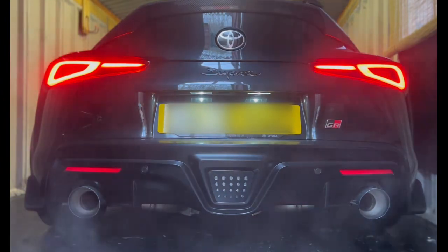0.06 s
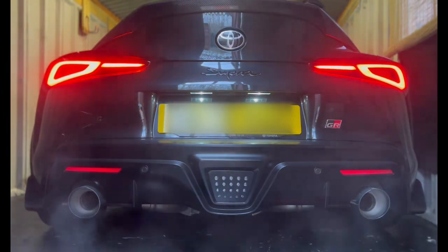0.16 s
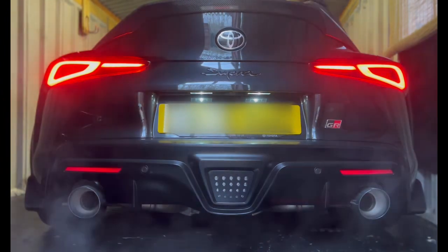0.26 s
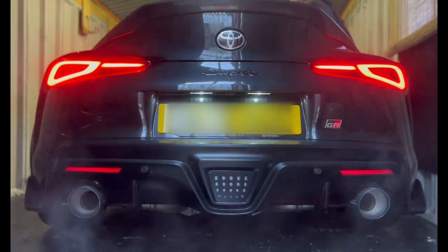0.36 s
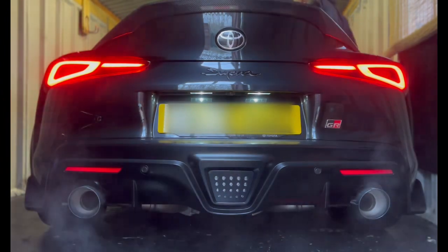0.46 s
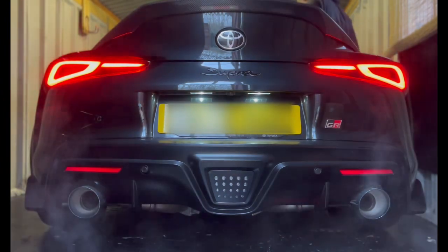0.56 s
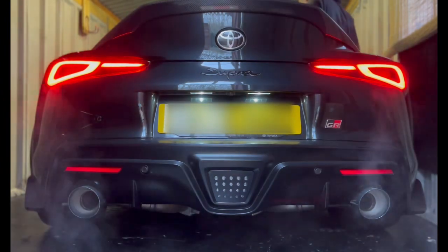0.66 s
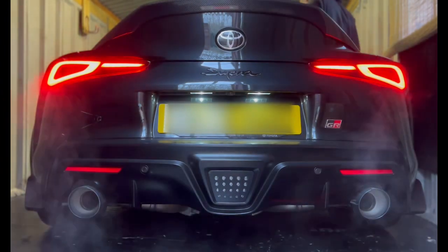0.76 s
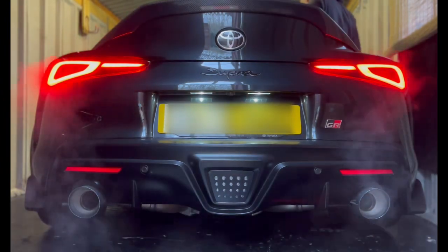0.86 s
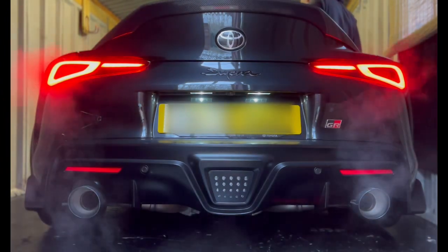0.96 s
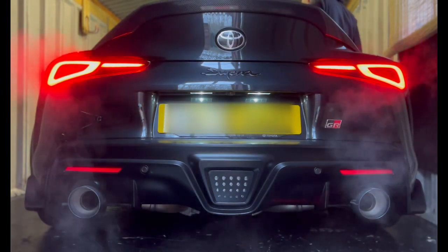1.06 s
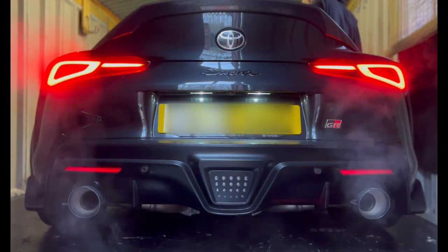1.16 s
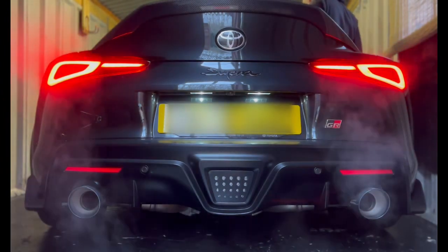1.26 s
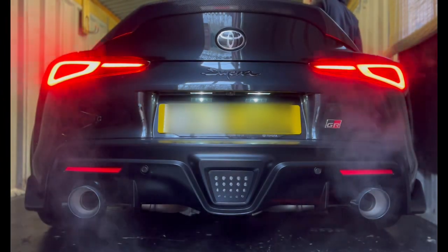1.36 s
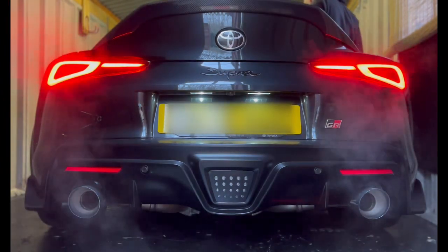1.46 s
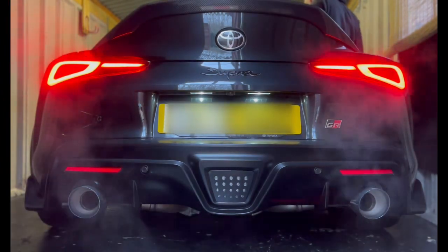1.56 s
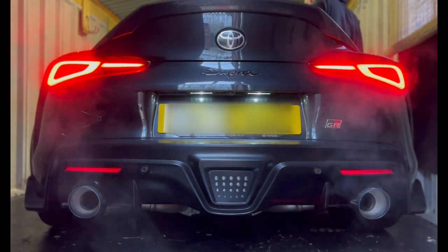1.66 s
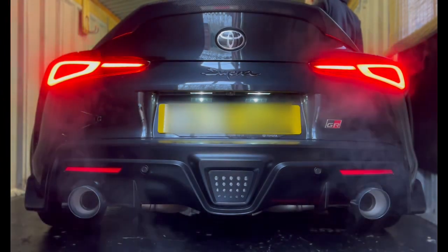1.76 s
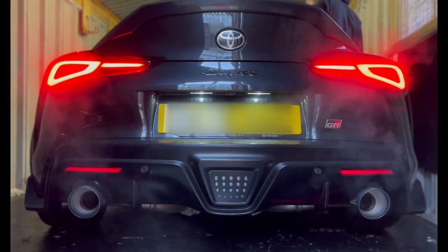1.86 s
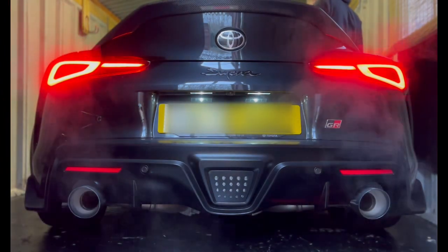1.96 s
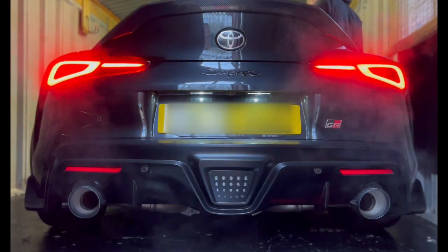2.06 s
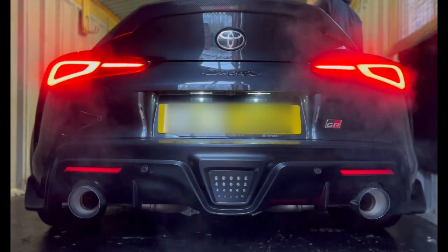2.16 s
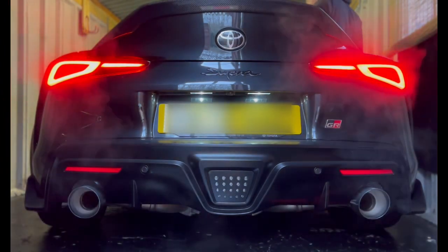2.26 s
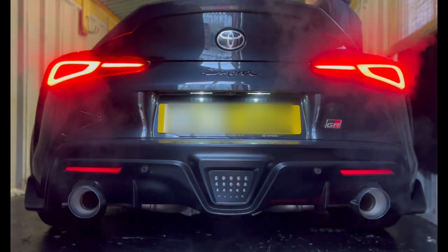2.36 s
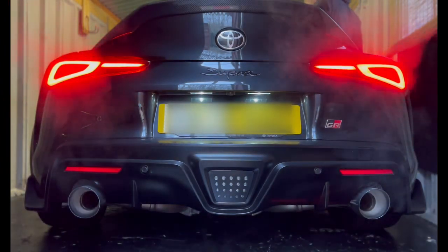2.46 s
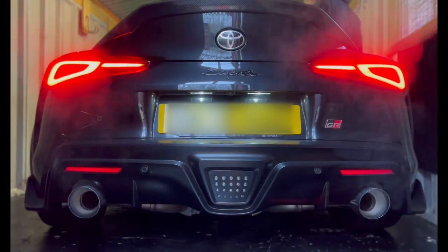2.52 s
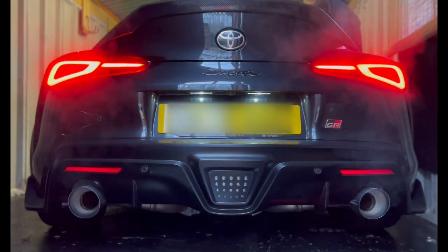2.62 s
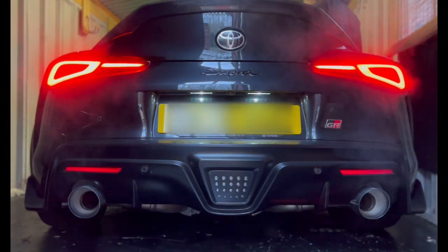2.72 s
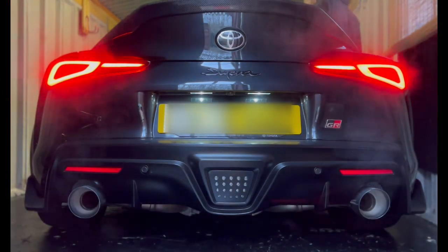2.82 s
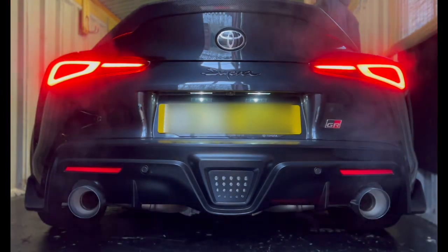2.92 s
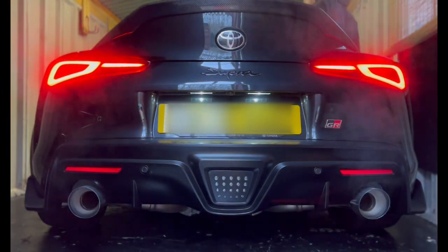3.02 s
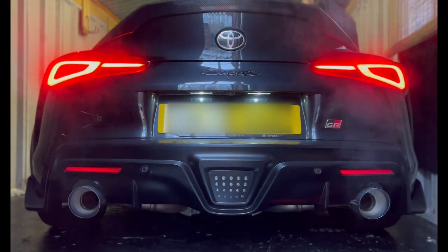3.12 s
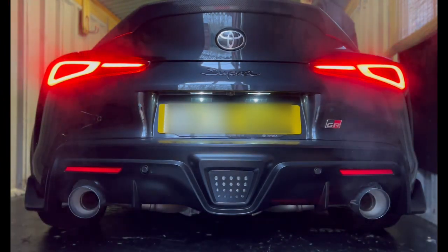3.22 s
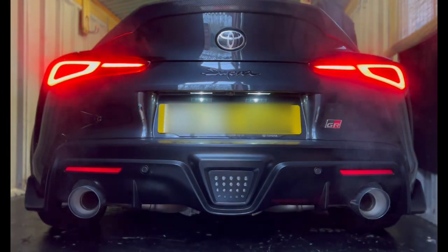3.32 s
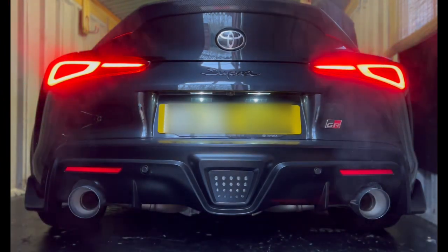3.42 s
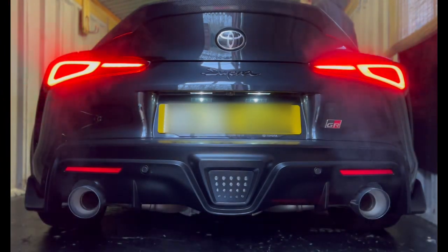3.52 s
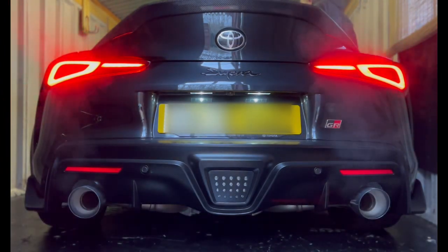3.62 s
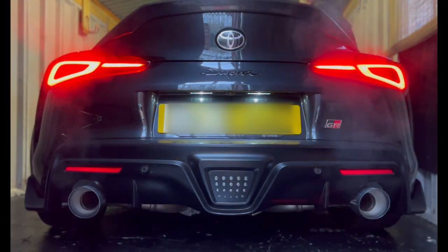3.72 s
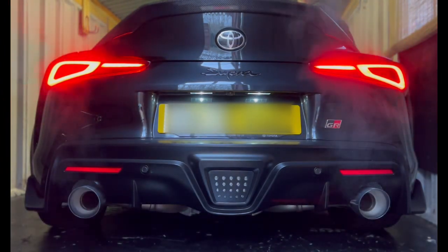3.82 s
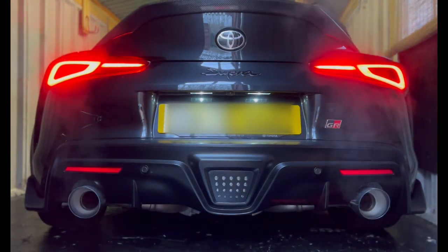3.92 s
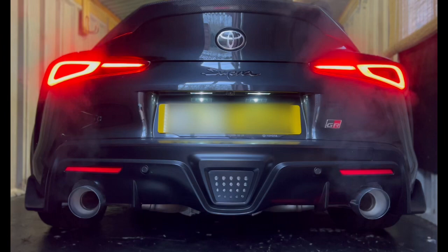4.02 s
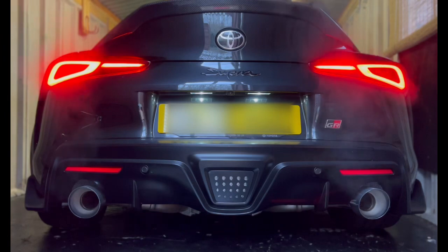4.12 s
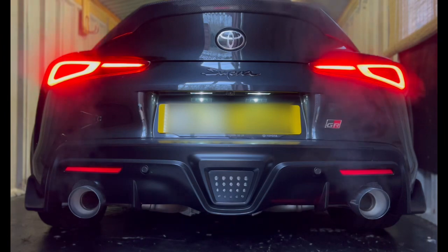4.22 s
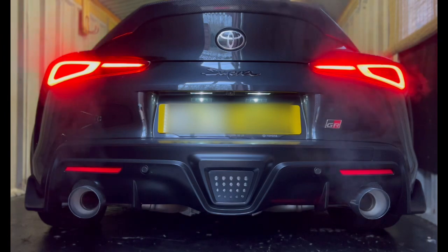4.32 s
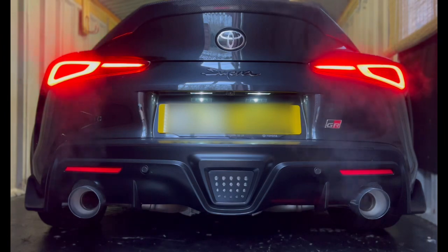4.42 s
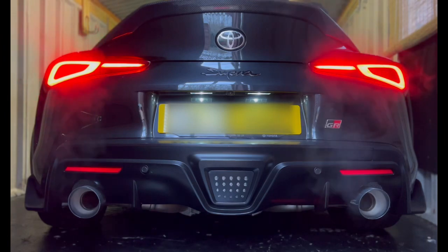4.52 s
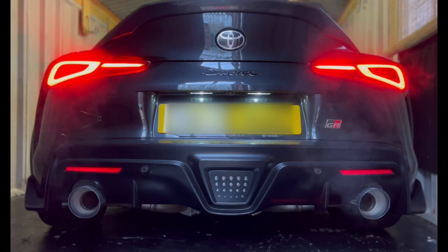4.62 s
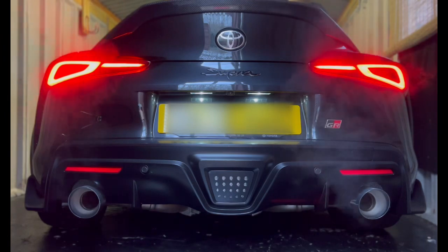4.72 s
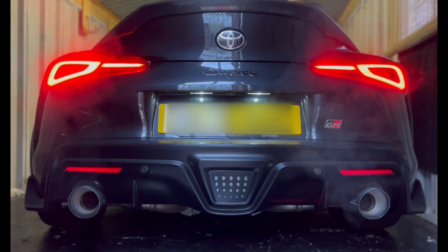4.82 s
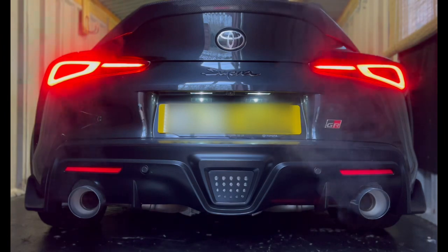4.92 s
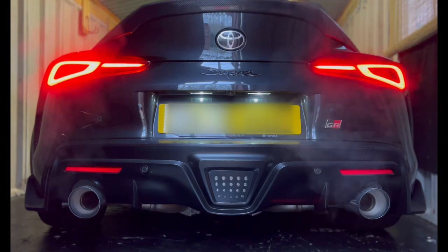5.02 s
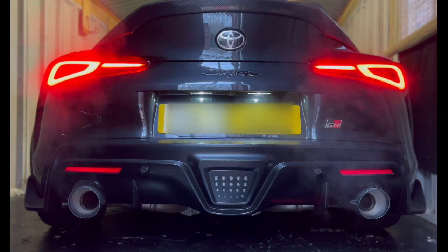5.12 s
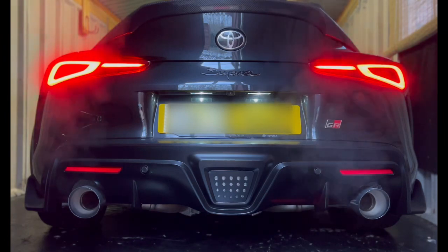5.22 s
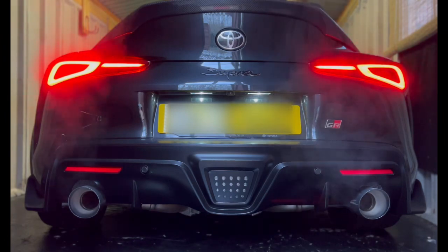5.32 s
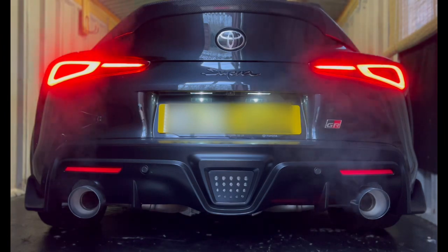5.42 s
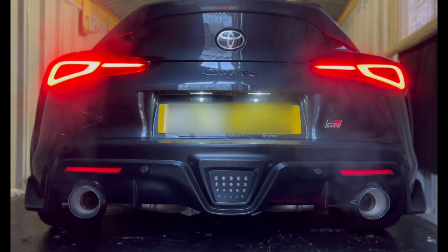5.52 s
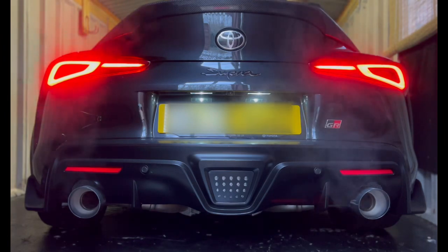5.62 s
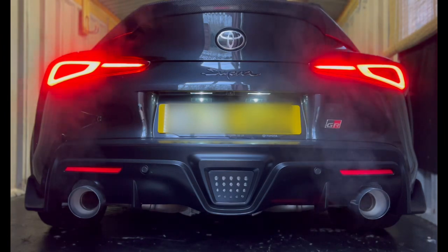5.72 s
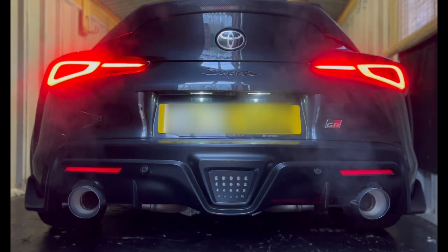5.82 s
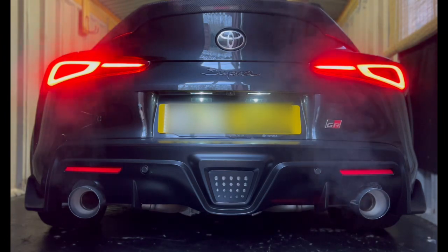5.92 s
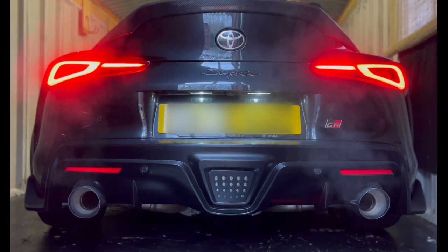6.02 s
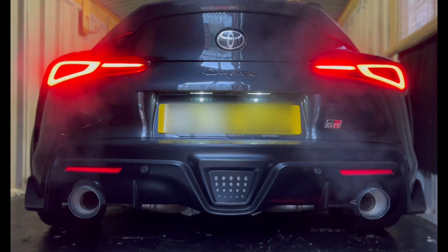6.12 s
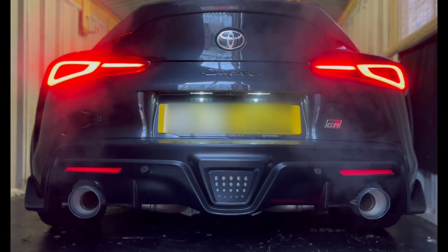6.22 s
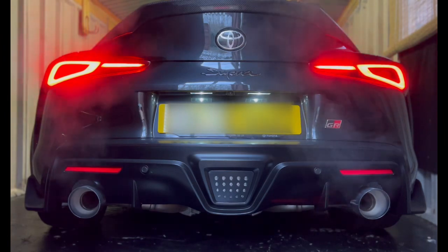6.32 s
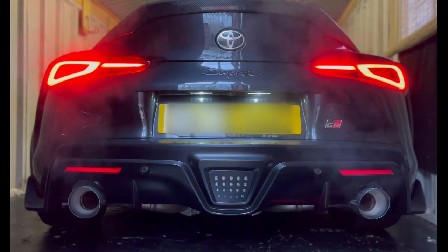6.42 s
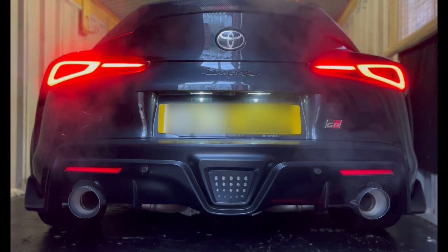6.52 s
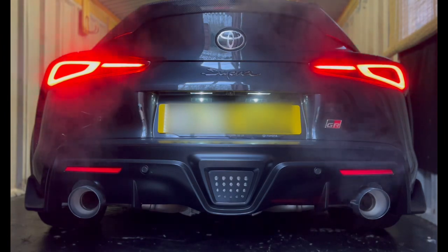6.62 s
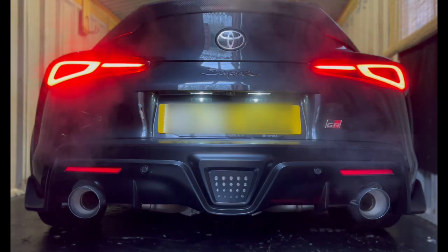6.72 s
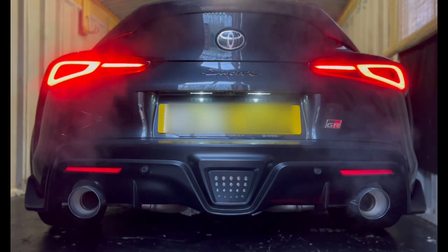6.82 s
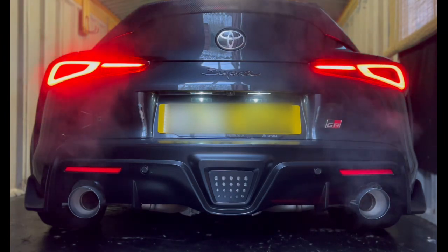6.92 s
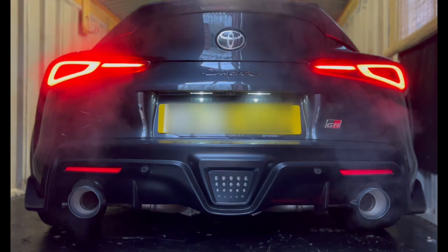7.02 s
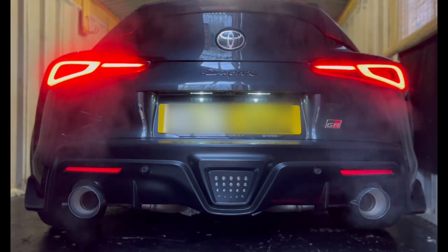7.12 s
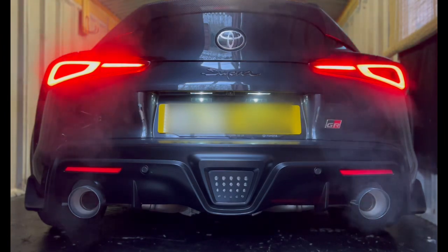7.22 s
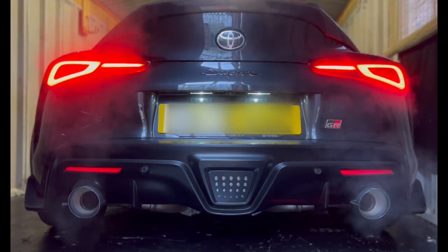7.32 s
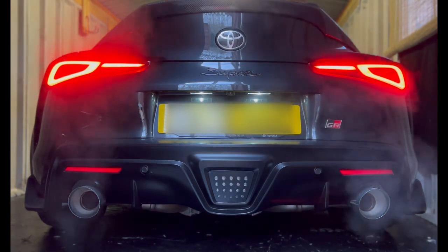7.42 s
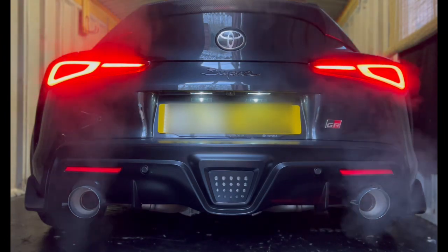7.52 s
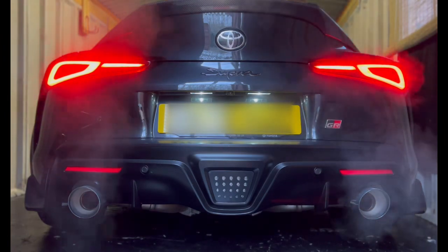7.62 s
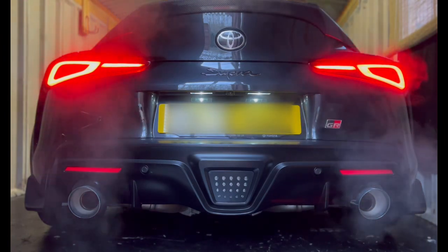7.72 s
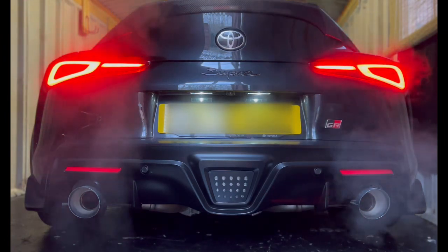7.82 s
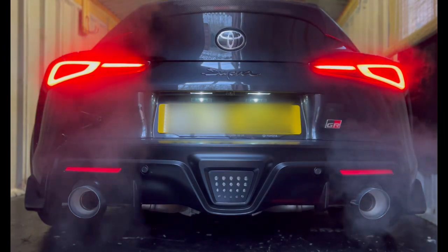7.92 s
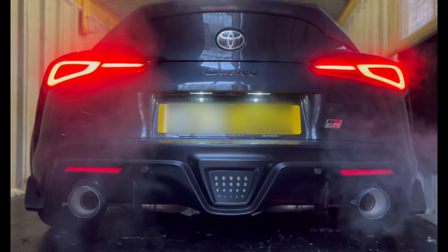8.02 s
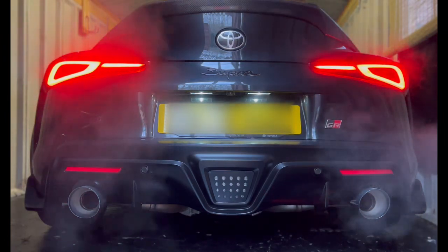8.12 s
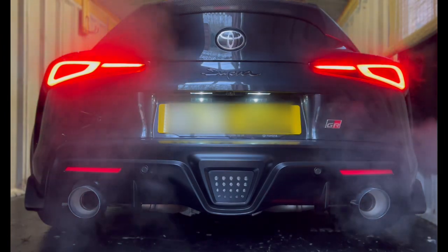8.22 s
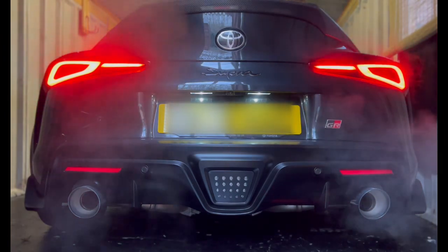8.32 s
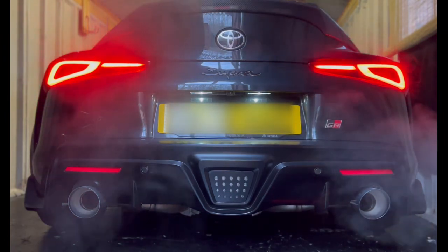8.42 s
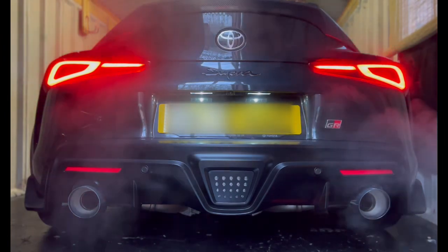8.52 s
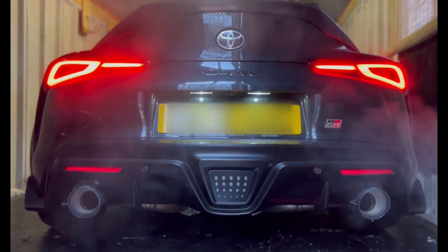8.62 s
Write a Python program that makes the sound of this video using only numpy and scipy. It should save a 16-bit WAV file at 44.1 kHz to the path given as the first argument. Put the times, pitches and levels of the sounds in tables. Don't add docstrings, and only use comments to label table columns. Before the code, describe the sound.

Stereo microphone near the exhausts of a six-cylinder car standing in a shed. Quiet gas rumble jumps to a throbbing idle that slowly fills out, with slight stumbles and breathy hiss. Thin bird whistles and trills come from outside. Later the engine rises to a steady booming fast idle, pops lightly, dips a touch, then is blipped hard, crackling into a fast rising raspy roar.

```python
import sys
import numpy as np
from scipy import signal
from scipy.fft import rfft
from scipy.io import wavfile
from scipy.ndimage import uniform_filter1d

SR = 44100
rng = np.random.default_rng(int(sys.argv[2]) if len(sys.argv) > 2 else 0)


def undo_db(level):
    steps = np.asarray(level, float) / 20
    return 10 ** steps


def to_wav(sig):
    pcm = np.clip(np.atleast_2d(sig), -1, 1) * 32767
    pcm = np.round(pcm).astype(np.int16)
    wavfile.write(sys.argv[1], SR, pcm.T)


N = 381906


def evened(x):
    return x / np.sqrt(np.mean(x ** 2) + 1e-20)


def read(points, hz):
    f, value = np.transpose(points)
    return np.interp(np.log(hz + 1), np.log(f + 1), value)


def columns(rows):
    s, *values = np.transpose(rows)
    return [np.interp(np.arange(N) / SR, s, v) for v in values]


def swell(s, length):
    return np.sin(np.pi * np.clip((np.arange(N) / SR - s) / length, 0, 1)) ** 2


def swells_db(rows):
    return sum(db * swell(s, length) for s, length, db in rows)


def causal(gain_db):
    mirrored_db = np.concatenate([gain_db, gain_db[..., -2:0:-1]], -1)
    log_gain = np.log(undo_db(mirrored_db))
    return np.fft.ifft(np.exp(np.conj(signal.hilbert(log_gain)))).real[..., :8192]


def shed(x, t60):
    t = np.arange(SR // 2) / SR
    struck = (rng.random((2, len(t))) < 2000 / SR) * (t > .004)
    taps = rng.choice([-1., 1.], (2, len(t))) * struck * undo_db(-60 * t / t60)
    return signal.fftconvolve(x[None], taps / np.linalg.norm(taps[0]), axes=1)[:, :N]


# (time [s], length [s], first pitch [Hz], last pitch [Hz], level [dB])
WHISTLES = [(0.028, .056, 3010, 3100, -72), (0.07, 0.058, 3470, 3180, -76), (0.205, .046, 4830, 4470, -74),
            (0.243, .065, 4950, 4880, -76), (.325, .03, 5100, 4000, -77), (0.37, .08, 3770, 3790, -78),
            (3.52, .12, 7750, 7600, -77), (3.832, .033, 4000, 3730, -62), (4.062, 0.025, 4450, 4370, -58),
            (4.086, .03, 3950, 3770, -61), (4.372, .23, 7870, 7550, -66), (4.627, .26, 6800, 6680, -78),
            (4.94, 0.071, 3850, 3580, -68), (5.675, 0.064, 7170, 7160, -63), (5.717, .05, 5150, 4900, -63),
            (6.25, .052, 3750, 4050, -59)]
TRILLS = [(3.45, .05, 8363, 8500, -70), (3.801, 0.043, 5000, 4650, -60), (3.901, .033, 4900, 5230, -58),
          (4.06, 0.035, 4930, 4660, -60), (4.64, 0.091, 7750, 7700, -70), (5.0, 0.054, 3260, 3630, -60),
          (5.815, 0.031, 4900, 5040, -58), (5.85, .1, 5500, 5300, -65), (5.853, 0.1, 6000, 6250, -63.5),
          (5.96, 0.11, 6260, 5960, -65), (6.208, .03, 5060, 5060, -62), (6.302, 0.13, 4200, 3800, -64)]


def robin():
    quiver_hz, trill_hz = 30, 260
    notes = [(*n, quiver_hz) for n in WHISTLES] + [(*n, trill_hz) for n in TRILLS]
    out = np.zeros(N)
    for s, length, first_hz, last_hz, db, swing_hz in notes:
        t = np.arange(0, length, 1 / SR)
        glide_hz = first_hz + (last_hz - first_hz) * t / length
        hz = glide_hz + swing_hz * np.sin(2 * np.pi * 70 * t)
        whistle = np.sqrt(2) * np.sin(2 * np.pi * np.cumsum(hz) / SR)
        out[round(s * SR):][:len(t)] += undo_db(db) * whistle * signal.windows.tukey(len(t), .4)
    return out


# (time [s], firings per second [Hz])
SPEED = [(.58, 44.7), (1.41, 44), (2.1, 43.4), (3.64, 43.4), (5.42, 42.9), (6.5, 42.8), (6.7, 46.1),
         (7.01, 49.1), (7.51, 52.8), (7.89, 54), (8.03, 53.3), (8.15, 52), (8.33, 51.7), (8.39, 62.6),
         (8.43, 78.9), (8.52, 116.9), (8.6, 143), (8.66, 153.3)]


def firing_rate():
    return columns(SPEED)[0]


# (time [s], level [dB])
EFFORT = [(0, -49), (.568, -52.5), (.585, -31.5), (.78, -33), (3.1, -34.5), (5.6, -32.5), (6.5, -33),
          (6.55, -23), (6.8, -19), (7.12, -14.5), (7.5, -16), (7.94, -15), (8.23, -17), (8.3, -23.5),
          (8.37, -9), (8.42, -8.5), (8.66, -8.5)]


def engine_effort_db():
    return columns(EFFORT)[0]


# (time [s], random spread of strength [1], cylinder unevenness [1],
# throttle [0-1], timing jitter [ms])
COMBUSTION = [(0, .9, .3, 0, 1.5), (.56, .9, .3, 0, 1.5), (.585, .2, .4, 0, .05), (6.5, .3, .25, 0, .1),
              (6.54, .25, .3, .6, .25), (6.95, .22, .5, .8, .3), (7.2, .25, 1, 1, .2), (8.3, .22, 1, 1, .2),
              (8.38, .6, .6, 1, .55), (8.55, .33, .4, 1, .25)]


def combustion():
    return columns(COMBUSTION)


def idle_fullness():
    return np.minimum(np.arange(N) / SR / 6.5, 1)


# (frequency [Hz], likeness [0-1])
LIKENESS = [(60, 1), (290, 0.92), (640, 0.24), (1400, 0.15), (3100, 0.39), (6800, 0.39), (9000, 0.23),
            (15000, 0.8)]
# (frequency [Hz], phase [radians])
LEFT_LEAD = [(0, 0), (400, .2), (860, -2.7), (1550, -3), (1810, -5.8), (4740, -5.4), (7320, -6.6),
             (9000, -8.6), (10200, -9.42), (11300, -10.6), (12300, -12), (13400, -12.57), (14500, -13.4),
             (15500, -14.6)]


def noise(spectrum, patchy_db, count=N):
    frames, hz = count // 256 + 5, np.fft.rfftfreq(1024, 1 / SR)
    a, b, c, d, patches = rng.standard_normal((frames, len(hz), 5), np.float32).T
    patches = uniform_filter1d(patches, size=12, axis=0)
    patches = evened(uniform_filter1d(patches, size=10, axis=1))
    same = np.clip(read(LIKENESS, hz), -1, 1)[:, None]
    late = np.exp(-1j * read(LEFT_LEAD, hz))[:, None]
    left = a + 1j * b
    right = same * late * left + np.sqrt(1 - same ** 2) * (c + 1j * d)
    z = np.array([left, right]) * undo_db(read(spectrum, hz)[:, None] + patchy_db * patches)
    return evened(signal.istft(z, nperseg=1024, noverlap=768)[1][:, :count])


RUMBLE = [(20, -30), (38, -10.5), (52, -3.5), (70, 9), (125, -7), (170, -10.5), (245, -7), (330, -10),
          (500, -28), (800, -33.5), (1500, -90.5)]
ROAR = [(260, -14.5), (450, -1), (607, -7), (728, -4.5), (1170, -4.5), (1590, -12.5), (1820, -12.5),
        (2160, -17.5), (2970, -21.5), (3180, -25), (4500, -30.5), (5850, -47.5), (9900, -120)]
RASP = [(290, -30), (500, 1), (665, -13), (852, -9.5), (1090, -19.5), (1300, -8.5), (1400, -20),
        (1510, -13), (2340, -20), (2620, -32), (4500, -43), (5850, -63), (9900, -120)]
HISS = [(1800, -36), (3000, -3), (4300, -8), (5000, -1), (6300, -4), (7600, -1.5), (8900, -7), (10000, -10),
        (11000, -16), (12500, -62.5)]
FIZZ = [(8500, -52.5), (10200, -6), (11200, -7), (14100, -8.5), (15100, -6.5), (15700, -12.5), (16500, -60)]
# (frequency [Hz], width [Hz], level [dB])
SINGING = [(4170, 30, 12), (5300, 20, 6.5), (5720, 32, -0.5), (7130, 90, 1)]
# (level as the idle begins [dB], rise through the idle [dB], share of effort followed
FLOW = [
    (-58.5, 12.5, 0.27, 0.19),
    (-81.5, 11.5, 0.5, 1.6),
    (-93, 9.5, 0.91, 1.3),
    (-42, 4.5, 0.41, 0.33),
]
# (time [s], length [s], level [dB])
SPURTS = [
    (0.575, 0.14, 1),
    (2.704, 0.39, 4),
    (8.347, .06, 5.5),
    (8.393, 0.12, 5.5),
]


def gas(rate, turns):
    t = np.arange(N) / SR
    effort_db = np.maximum(engine_effort_db() + 34, -2)
    spurt_db = swells_db(SPURTS)
    roar_db, hiss_db, fizz_db, rumble_db = (
        early_db + rise * idle_fullness() + follow * effort_db + share * spurt_db
        for early_db, rise, follow, share in FLOW)
    rumble_db = rumble_db + 1.5 * combustion()[2]
    rumble_db = rumble_db - 1.5 * (t < 0.569)

    size = undo_db(5.1 * rng.standard_normal(int(turns[-1]) + 1))[turns.astype(int)]
    puff = size * np.exp(-(turns % 1) / 0.5)

    blip = np.clip((rate - 54.5) / 5, 0, 1)
    roar = (1 - blip) * noise(ROAR, patchy_db=1.63) * evened(1 + 0.1 * puff)
    start = np.argmax(blip > 0)
    rasp = np.pad(noise(RASP, patchy_db=1, count=N - start), ((0, 0), (start, 0)))
    rasp = rasp + 0.18 * rasp[::-1]
    rasp_db = 14 - 42.5 * abs(t - 8.45)
    rasp = blip * rasp * evened(1 + 1.7 * puff) * undo_db(rasp_db)

    hiss = undo_db(hiss_db + 7.0) * noise(HISS, patchy_db=1.8) * evened(1 + 0.25 * puff)
    for hz, width, db in SINGING:
        band = signal.lfilter(*signal.iirpeak(hz, hz / width, SR), hiss)
        hiss = hiss + undo_db(db) * band * (rate < 45)
    fizz = undo_db(fizz_db + 6.5) * noise(FIZZ, patchy_db=2.5) * evened(1 + .5 * puff)
    rumble = undo_db(rumble_db) * noise(RUMBLE, patchy_db=2.5)
    return undo_db(roar_db + 4.5) * (roar + rasp) + hiss + fizz + rumble


# (time [s], crack peak [dB], thud level [dB])
POPS = [
    (7.0518, -35, -14),
    (7.29, -50.5, -18.5),
    (8.383, -34.5, -14),
    (8.411, -31.5, -16),
    (8.441, -37, -25),
]


def late_burns():
    out, t = np.zeros(N), np.arange(1500) / SR
    crack = signal.lfilter(*signal.iirpeak(8200, 2, SR), rng.standard_normal(len(t)))
    crack = crack * undo_db(-60 * t / .03)
    thud = np.sin(2 * np.pi * 300 * t) + np.sin(2 * np.pi * 398 * t)
    thud = thud * np.hanning(len(t)) * undo_db(-60 * t / 0.13)
    for s, crack_db, thud_db in POPS:
        out[round(s * SR):][:len(t)] += undo_db(crack_db) * crack + undo_db(thud_db) * thud
    return out


# (frequency [Hz], width [Hz], level over effort [dB])
BOOM = [(52.8, 4.4, 1.5), (85, 8.8, 1.5), (111.8, 17, -3), (134.3, 12.6, 3), (222, 34, -5.5),
        (315, 57, -3.5), (464, 26, -5.5)]


def boom_db(hz):
    power = sum(undo_db(2 * db) / (1 + (2 * (hz - mode_hz) / width) ** 2) for mode_hz, width, db in BOOM)
    return 10 * np.log10(power)


# (early idle [dB], full idle [dB])
IDLE_ORDERS = [(-13.5, -5.5), (-11, 1), (-5.5, -3)]


def order_levels_db(rate, pulses_db, throttle):
    opened = np.minimum(2 * throttle, 1)
    levels = []
    for k, (early_db, full_db) in enumerate(IDLE_ORDERS):
        idle_db = early_db + (full_db - early_db) * idle_fullness()
        levels.append(pulses_db + (1 - opened) * idle_db + opened * boom_db((k + 1) * rate))
    levels[-1] = levels[-1] + 12.5 * swell(0.569, 0.2)
    return levels


# (frequency [Hz], width [Hz], idle level [dB], throttle level [dB])
PIPE = [(55, 19, -3, -5.5), (80.5, 58, -0.5, -4.5), (137.2, 23, -2, 9), (219.1, 13, -5, 6.5),
        (238.5, 44, -35, -6.5), (303.5, 20.6, -8, -7), (398, 27, -17.5, -13), (469.7, 14.2, -23.5, -12.5),
        (573, 6.7, -31.5, -17.5), (800, 320, -51.5, -37.5)]


def pipe_ring(level_column):
    hz = np.fft.rfftfreq(32768, 1 / SR)
    power = sum(undo_db(2 * m[level_column]) / (1 + (2 * (hz - m[0]) / m[1]) ** 2) ** 1.346 for m in PIPE)
    power = power / (1 + (45 / (hz + 1)) ** 8) / (1 + (hz / 600) ** 6)
    return causal(10 * np.log10(power + 1e-13))


# (strength offset [1], lateness [ms])
CYLINDERS = [(-0.14, 0.71), (-0.58, -0.57), (-0.22, 0.05), (-0.9, -0.69), (0.21, 0.26), (-.35, 0.068)]
# (time [s], length [s], level [dB])
STUMBLES = [(2.998, 0.095, -10), (3.413, 0.09, -9), (3.835, 0.058, -7), (6.24, 0.064, -4)]


def exhaust(rate, turns):
    pulses_db = engine_effort_db() + swells_db(STUMBLES)
    spread, uneven, throttle, jitter_ms = combustion()
    order_db = order_levels_db(rate, pulses_db, throttle)

    at = np.flatnonzero(np.diff(np.floor(turns))) + 1
    chance = rng.standard_normal((len(at), 3))
    stronger, later_ms = np.resize(CYLINDERS, (len(at), 2)).T
    late = (jitter_ms[at] * chance[:, 1] + uneven[at] * later_ms) * SR / 1000
    excess = np.zeros(N)
    excess[at] = spread[at] * chance[:, 0] + uneven[at] * stronger
    blunt = signal.windows.hann(250)
    excess = signal.oaconvolve(excess, blunt / blunt.sum(), "same")
    excess[np.clip(at + late.astype(int), 0, N - 1)] += 1
    excess[at] -= 1

    t = np.arange(N)
    coarse = t[::64]
    hz = np.fft.rfftfreq(32768, 1 / SR)
    orders_hz = np.arange(1, 14)[:, None] * rate[::64]
    burble, response = np.zeros(N), 0
    for share, level_column in ((1 - throttle, 2), (throttle, 3)):
        ring = pipe_ring(level_column)
        burble += share * signal.oaconvolve(excess, ring)[:N]
        response = response + share[::64] * np.interp(orders_hz, hz, rfft(ring, 32768))
    response = response * np.sqrt(2) * rate[::64] / SR
    gain = undo_db(pulses_db) / np.interp(t, coarse, np.linalg.norm(response, axis=0))

    lurch_db = 14 * np.minimum(spread[at], .4) * (1 - throttle[at]) * chance[:, 2]
    order_db[0] = order_db[0] + np.interp(t, at, lurch_db)
    out = gain * burble
    for k, line in enumerate(response):
        if k < len(order_db):
            rms = undo_db(order_db[k])
        else:
            rms = gain * np.interp(t, coarse, abs(line))
        phase = np.interp(t, coarse, np.unwrap(np.angle(line)))
        out += np.sqrt(2) * rms * np.cos(2 * np.pi * (k + 1) * turns + phase)
    return out


def scene():
    rate = firing_rate()
    turns = np.cumsum(rate) / SR
    bird, pipe = robin(), -exhaust(rate, turns)
    outside = undo_db(-4.0) * bird + undo_db(-0.5) * shed(bird, t60=0.53)
    return outside + gas(rate, turns) + late_burns() + pipe + undo_db(-16.5) * shed(pipe, t60=0.36)


def low_pass(x):
    return signal.sosfilt(signal.butter(12, 15700, fs=SR, output="sos"), x)


# (frequency [Hz], level [dB])
LEAN = [(60, -1), (110, -1.7), (200, -2.3), (380, -3), (700, -.5), (1290, 0), (2380, .7), (4400, 4),
        (8120, 1.5), (9300, 0)]
# (from [Hz], to [Hz])
CANCELLED = [
    (9250, 11050),
    (12300, 14400),
]


def record(dry):
    hz = np.fft.rfftfreq(4096, 1 / SR)
    ports = causal(np.outer([.5, -.5], read(LEAN, hz)))[:, :2048]
    x = signal.oaconvolve(dry, ports, axes=1)[:, :N]
    x = signal.sosfilt(signal.butter(4, 36, "high", fs=SR, output="sos"), x)
    x = x * np.minimum(np.arange(N)[::-1] / 150, 1)
    left, right = x / (1 + (x / .97) ** 4) ** .25
    mid, side = (
        signal.sosfiltfilt(signal.butter(5, band, "bandstop", fs=SR, output="sos"), y / 2, padlen=3000)
        for y, band in zip((left + right, left - right), CANCELLED))
    return low_pass(np.array([mid + side, mid - side]))


dry = scene()
out = record(dry)
to_wav(out)
```